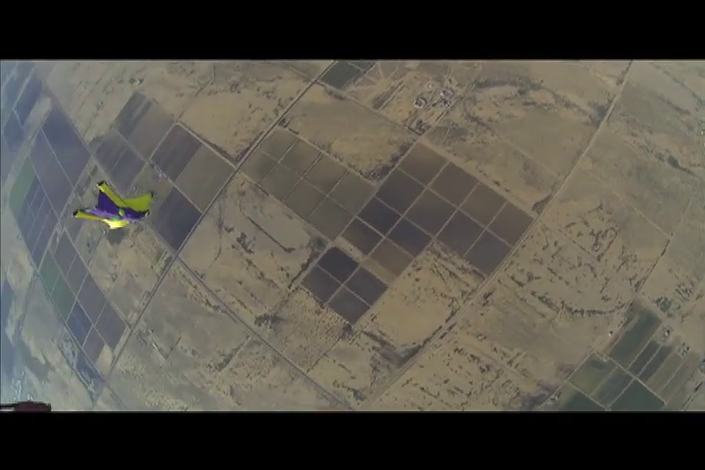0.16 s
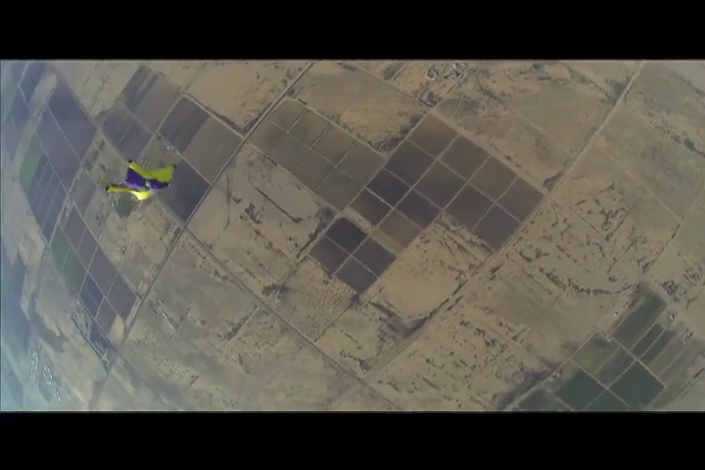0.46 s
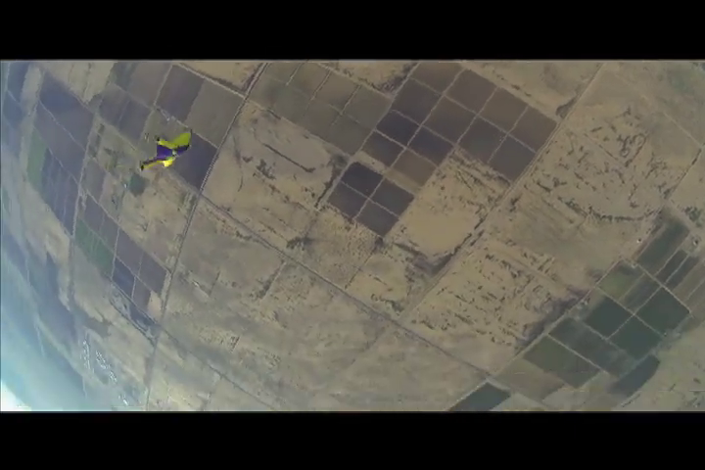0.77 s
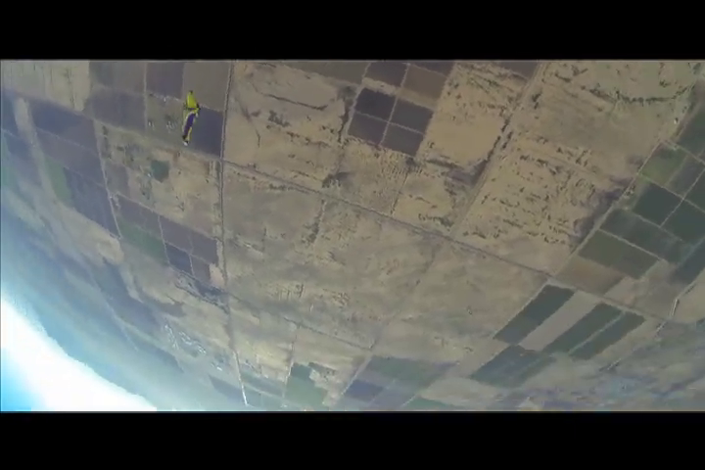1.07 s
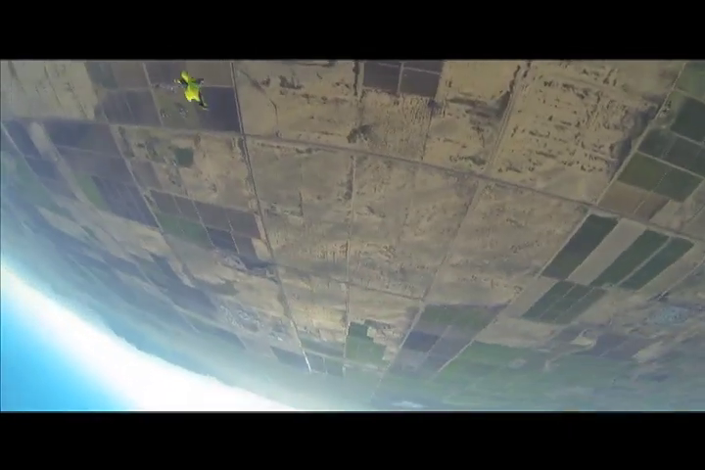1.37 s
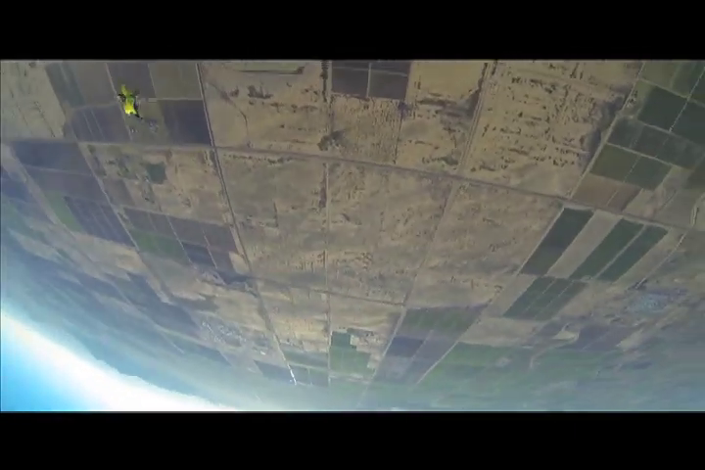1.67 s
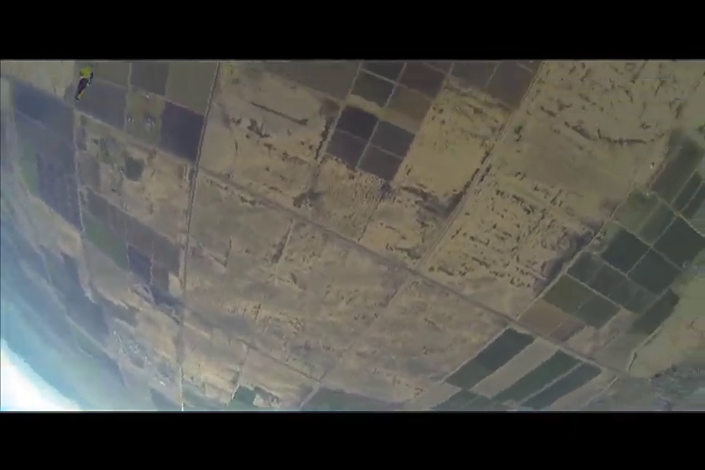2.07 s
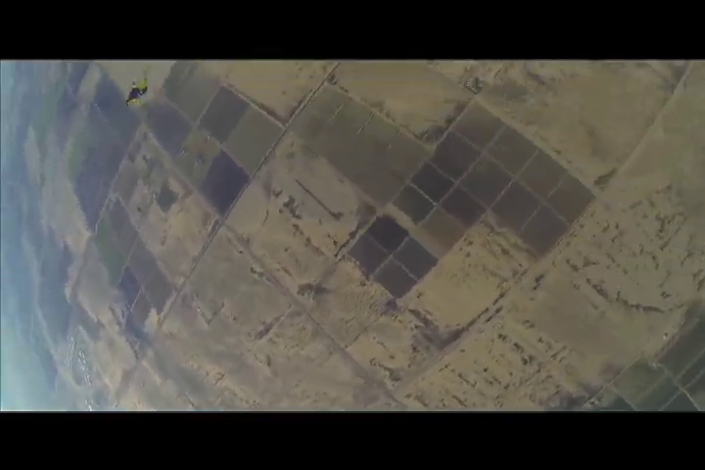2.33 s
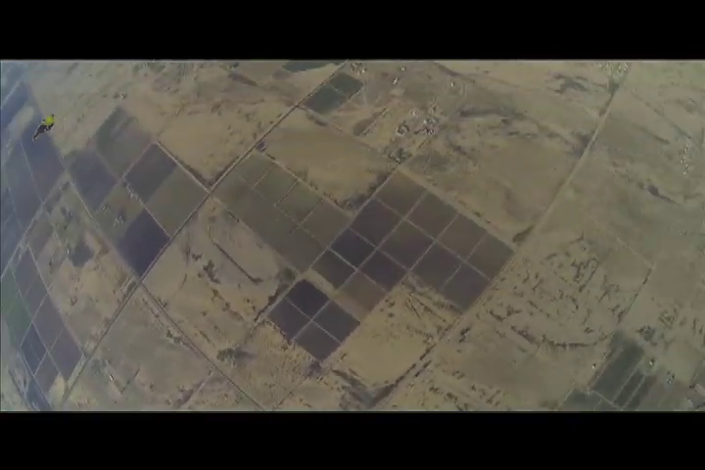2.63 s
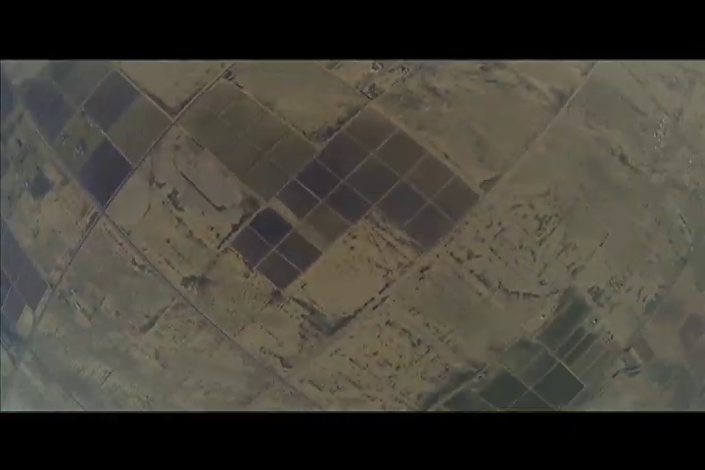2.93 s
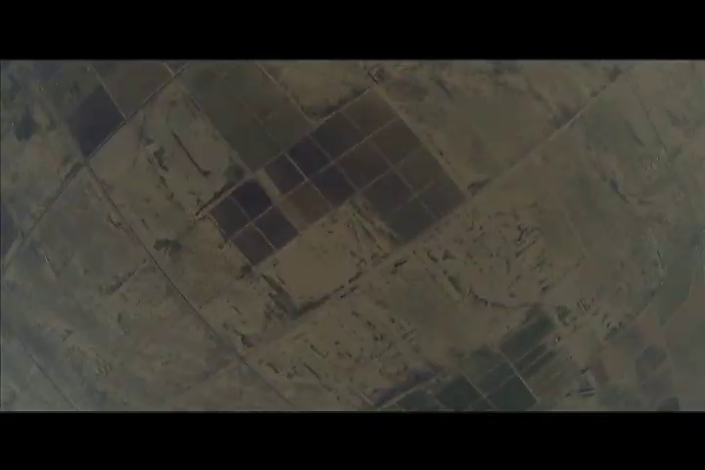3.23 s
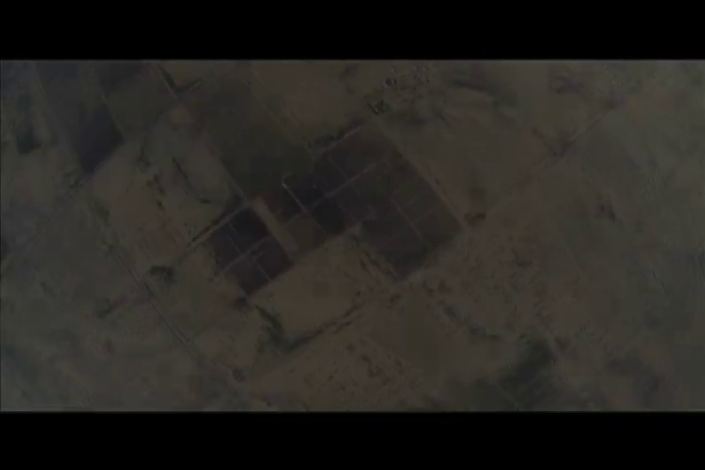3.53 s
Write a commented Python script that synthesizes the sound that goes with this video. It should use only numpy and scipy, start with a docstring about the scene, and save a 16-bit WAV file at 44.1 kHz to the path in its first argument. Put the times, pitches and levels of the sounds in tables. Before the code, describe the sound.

Strong wind roars right on a skydiver's microphone in open-air freefall. Low buffets thump and distort under a hollow howl and hiss. Brief breathy whistles pass, then the roar eases. Everything is on the left.

```python
"""Wind in freefall, right on the microphone of a camera carried by a skydiver in the open air.
Eddies buffet the microphone; the flow rushes past, blows a hollow howl in the housing and hisses
and whistles over its edges. The one live channel, the left, overloads on the strongest buffets.
The roar eases towards the end."""
import sys
import numpy as np
from scipy import signal
from scipy.fft import rfft, irfft
from scipy.io import wavfile

SR = 44100
rng = np.random.default_rng(int(sys.argv[2]) if len(sys.argv) > 2 else 0)


def store_wav(level_fs):
    """Save 16-bit WAV to argv[1]."""
    pcm = np.round(np.clip(np.atleast_2d(level_fs), -1, 1) * 32767)
    wavfile.write(sys.argv[1], SR, pcm.T.astype(np.int16))


N = 163170


def amp(db):
    """Decibels to gain."""
    return 10 ** (np.asarray(db) / 20)


def unit(x):
    """Scales to rms 1."""
    return x / np.sqrt(np.mean(x ** 2) + 1e-20)


def curve(table, column=1):
    """One column of a timed table, at every sample."""
    rows = np.array(table)
    return np.interp(np.arange(N) / SR, rows[:, 0], rows[:, column])


def swell(peak_s, spread_s):
    """A bell-shaped bump of height 1 around a moment."""
    return np.exp(-.5 * ((np.arange(N) / SR - peak_s) / spread_s) ** 2)


def noise(colour, resonances=()):
    """Noise of rms 1 with a broad colour and narrow resonances."""
    hz = np.fft.rfftfreq(N, 1 / SR)
    colour_hz, colour_db = np.transpose(colour)
    shape_db = np.interp(np.log(hz + 1), np.log(colour_hz), colour_db)
    for centre_hz, width_hz, lift_db in resonances:
        shape_db += lift_db / (1 + (2 * (hz - centre_hz) / width_hz) ** 2)
    return unit(irfft(rfft(rng.standard_normal(N)) * amp(shape_db), N))


def wander(rate_hz):
    """Smooth random drift of rms 1, from 2 Hz up to about the given rate."""
    hz = np.fft.rfftfreq(N, 1 / SR)
    return unit(irfft(rfft(rng.standard_normal(N)) * (hz > 2) / (1 + (hz / rate_hz) ** 2), N))


def blown(pitch_hz, width_hz):
    """Turbulence in a steep-sided resonance, at rms 1."""
    offset_hz = np.fft.fftfreq(N, 1 / SR)
    real, imag = rng.standard_normal((2, N))
    flutter = np.fft.ifft((real + 1j * imag) / (1 + abs(2 * offset_hz / width_hz) ** 1.71))
    carrier = np.exp(2j * np.pi * pitch_hz * np.arange(1, N + 1) / SR)
    return unit((flutter * carrier).real)


def steadied(x, samples):
    """Evens out slow swells, as in a flow of constant speed."""
    window = np.hanning(samples)
    power = signal.fftconvolve(x ** 2, window, "same") / signal.fftconvolve(np.ones(N), window, "same")
    return x / np.sqrt(power + 1e-9)


def whistles():
    """Brief breathy whistles as the flow catches an edge of the housing."""
    # swells of narrow noise: peak_s, spread_s, pitch_hz, width_hz, level_db
    catches = [(0.733, 0.05, 2750, 600, -27.5), (2.19, 0.02, 2870, 380, -22),
               (2.315, 0.028, 2730, 360, -20.5), (2.416, 0.088, 2393, 1100, -25.5),
               (2.44, .05, 858, 200, -28.5)]
    return sum(amp(level_db) * swell(peak_s, spread_s) * blown(pitch_hz, width_hz)
               for peak_s, spread_s, pitch_hz, width_hz, level_db in catches)


def hiss(flow_db):
    """Fine turbulence over the edges, coloured by the housing."""
    # broad spectrum of the turbulence: frequency_hz, gain_db
    colour = [(400, -28), (900, -2.5), (1400, -6.5), (1750, -5), (2050, 1), (2400, 2.5), (2780, 6.5),
              (3100, 3), (3400, -0.5), (3550, -4.5), (3850, -7.5), (4500, -7.5), (5100, -4.5),
              (5900, -12.5), (6900, -14), (8100, -15), (8900, -19), (10100, -18), (11500, -22.5),
              (12300, -26), (13000, -24), (14200, -30), (15700, -51)]
    # narrow resonances of the housing: centre_hz, width_hz, lift_db
    resonances = [(3375, 200, 5), (3710, 99, 4), (4100, 170, 6.5), (4550, 210, 4), (5040, 400, 4),
                  (6370, 350, 8), (7340, 340, 5.5), (8330, 350, 2.5)]
    return amp(flow_db - 24) * noise(colour, resonances)


def rush(flow_db):
    """The broad low-mid body of the air streaming past the camera."""
    # course of the rush before the flow lifts or lowers it: time_s, relative_db
    levels = [(0, -22), (.24, -21), (.5, -24.5), (.7, -26), (.82, -31.5), (1.3, -27), (1.7, -29.5),
              (1.88, -29.5), (2.12, -30), (2.33, -34.5), (2.46, -26.5), (2.58, -27), (2.8, -29.5),
              (3.08, -33.5), (3.35, -32), (3.7, -33.5)]
    # spectrum of the rush: frequency_hz, gain_db
    colour = [(80, -24), (220, 4.5), (330, 1), (500, -5.5), (600, 1.5), (690, 5.7), (790, 1.5), (900, 5),
              (1100, 0), (2000, -4), (5000, -33)]
    trim_db, flow_follow = 1.5, 0.99
    return amp(curve(levels) + trim_db + flow_follow * flow_db) * noise(colour)


def cavity_howl(flow_db):
    """Air blows the housing's cavity: a hollow howl that flickers and bends a little in pitch."""
    # course of the howl before the flow lifts or lowers it: time_s, relative_db, bend_hz
    blowing = [(0, -13.5, 10.5), (.15, -12.5, -35), (.37, -13, -40), (.62, -13.5, 15.5), (.8, -17.5, 45),
               (1.1, -16.5, 20), (1.38, -15, 54), (1.52, -17, 24), (1.9, -16, 15.5), (2.2, -19, 10),
               (2.5, -16, 4.5), (2.78, -15.5, -39), (3.05, -17, -20.5), (3.7, -18, 0.5)]
    # the cavity's resonance: frequency_hz, gain_db
    colour = [(800, -31), (1050, -14.5), (1180, -8), (1310, -0.5), (1480, 0), (1600, -3), (1800, -8.5),
              (2000, -14.5), (2600, -28), (5000, -81)]
    trim_db, flow_follow, flicker_db = 0.4, 0.72, 0.93
    bend = np.exp(2j * np.pi * np.cumsum(curve(blowing, column=2)) / SR)
    howl = steadied((signal.hilbert(noise(colour)) * bend).real, samples=7000)
    level_db = curve(blowing) + trim_db + flow_follow * flow_db + flicker_db * wander(rate_hz=37)
    return amp(level_db) * howl


def buffet():
    """Eddies throb directly on the microphone; a deep rumble grows with the buffeting."""
    # strength of the buffeting between thumps: time_s, relative_db
    buffeting = [(0, -14), (.2, -14.5), (.48, -14), (.64, -17.3), (.8, -15), (.9, -17.5), (1.02, -15.8),
                 (1.15, -18), (1.5, -15.5), (1.68, -18), (1.86, -15), (2.2, -18.2), (2.78, -19),
                 (3.06, -29), (3.35, -22.5), (3.5, -28), (3.7, -27.5)]
    # brief swells in the low buffeting, heard as thumps: peak_s, lift_db
    thumps = [(.03, 4), (.19, 3.5), (.27, 3), (.48, 3.5), (.77, 2), (.835, 4.5), (.98, 2.5), (1.045, 3.5),
              (1.205, 6), (1.275, 4), (1.509, 5), (1.595, 4), (1.715, 4.5), (2.08, 4)]
    # spectrum of the throb: frequency_hz, gain_db
    throb_colour = [(25, -15.5), (55, -3.5), (78, 2.5), (98, -2.5), (120, -8.5), (150, -13.5), (185, -16.5),
                    (240, -15.5), (330, -26), (600, -39), (1500, -78)]
    # spectrum of the rumble: frequency_hz, gain_db
    rumble_colour = [(5, -11), (20, 4), (42, -1), (60, 2), (100, -18.5), (160, -16.5), (220, -24.5),
                     (500, -27.5), (1500, -71.5)]
    throb_trim_db, rumble_trim_db, rumble_follow = -1.1, 2, 1.29
    thump_db = sum(lift_db * swell(peak_s, spread_s=0.013) for peak_s, lift_db in thumps)
    strength_db = curve(buffeting) + thump_db
    throb = amp(strength_db + throb_trim_db) * steadied(noise(throb_colour), samples=5000)
    rumble_db = rumble_follow * strength_db + rumble_trim_db
    rumble = amp(rumble_db) * steadied(noise(rumble_colour), samples=6000)
    return throb + rumble


def scene():
    """All the wind reaches the left channel; the right is silent."""
    # strength of the airflow over the camera as the body turns: time_s, relative_db
    airflow = [(0, -2), (.06, -4), (.14, 2), (.21, 0), (.37, 1), (.52, 0.1), (.66, 1), (.75, 4.5),
               (.85, -1.5), (.94, 3.5), (1.07, -.5), (1.195, 2.6), (1.22, -4), (1.33, -3), (1.41, 0.5),
               (1.5, 1.7), (1.53, -1.5), (1.63, -1.5), (1.7, 1.3), (1.74, -1), (1.86, 2), (2.06, 3),
               (2.1, 0), (2.21, 2.5), (2.45, 0), (2.66, -2.5), (2.93, 0), (3.12, -1.5), (3.32, -0.8),
               (3.7, -3.5)]
    gust_db = .45 * wander(rate_hz=20)
    flow_db = curve(airflow) + gust_db
    wind = buffet() + rush(flow_db) + cavity_howl(flow_db) + hiss(flow_db) + whistles()
    return np.array([wind, np.zeros(N)])


def record(dry):
    """The microphone's gain drives the wind into hard overload; then the top treble is cut."""
    drive_db, cutoff_hz = 6, 15700
    clipped = np.clip(dry * amp(drive_db), -1, 1)
    band_limit = signal.firwin(511, cutoff_hz, window=("kaiser", 9), fs=SR)
    return signal.oaconvolve(clipped, band_limit[None], "same")


dry = scene()
out = record(dry)
store_wav(out)
```